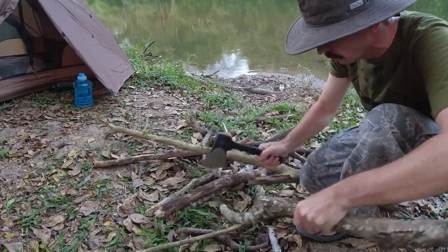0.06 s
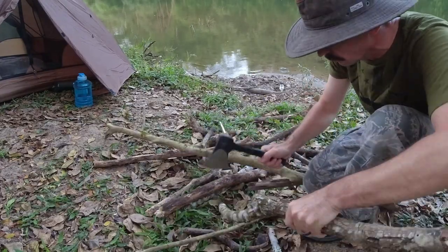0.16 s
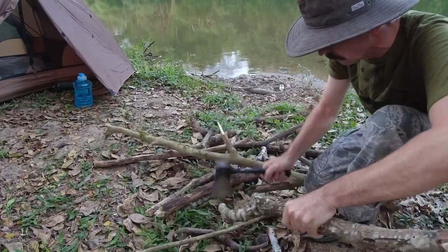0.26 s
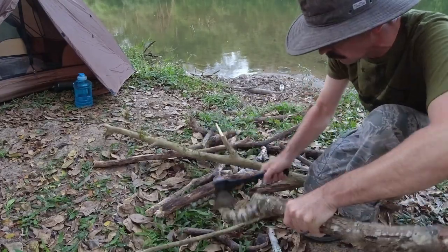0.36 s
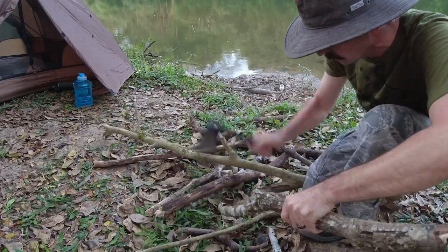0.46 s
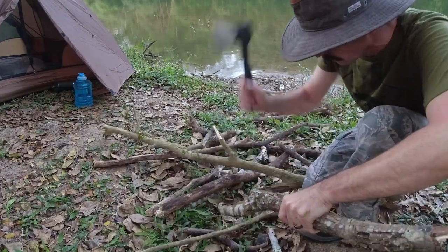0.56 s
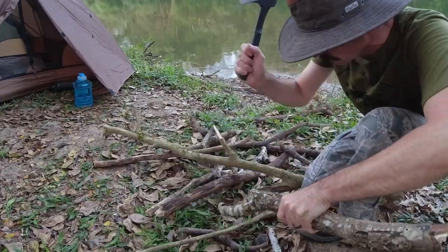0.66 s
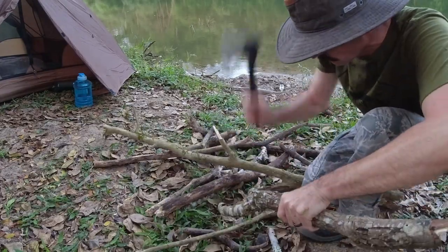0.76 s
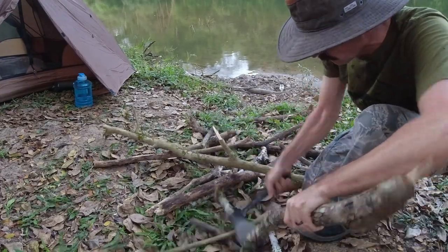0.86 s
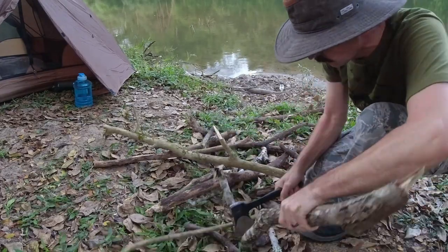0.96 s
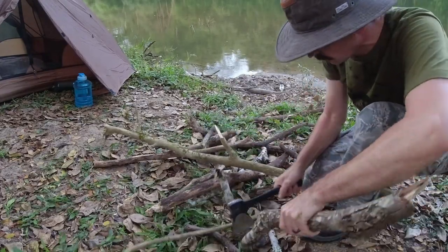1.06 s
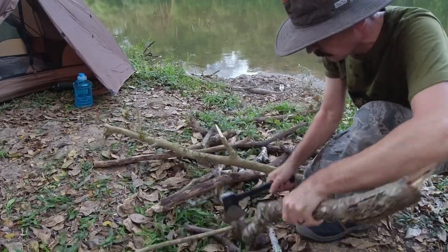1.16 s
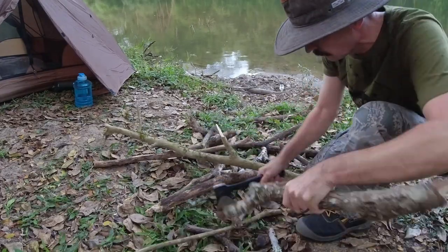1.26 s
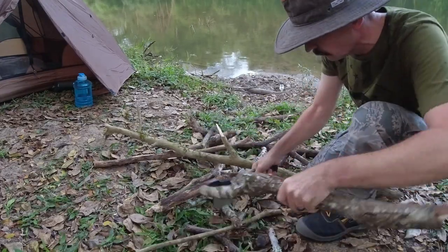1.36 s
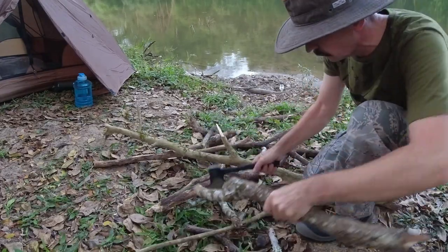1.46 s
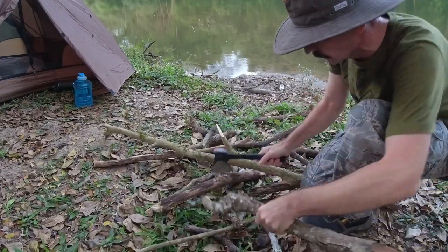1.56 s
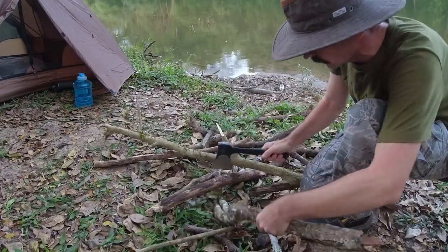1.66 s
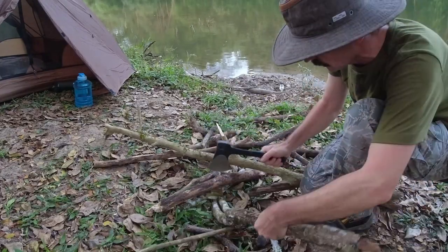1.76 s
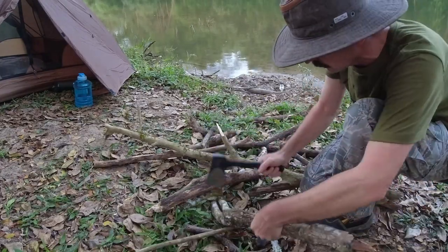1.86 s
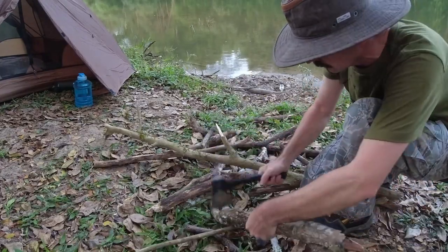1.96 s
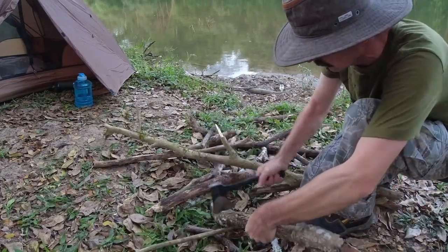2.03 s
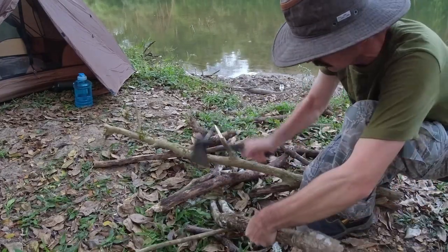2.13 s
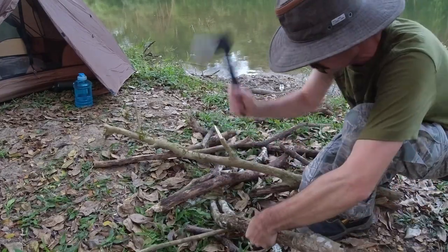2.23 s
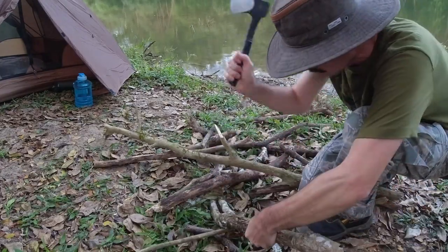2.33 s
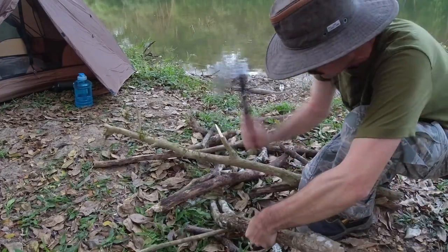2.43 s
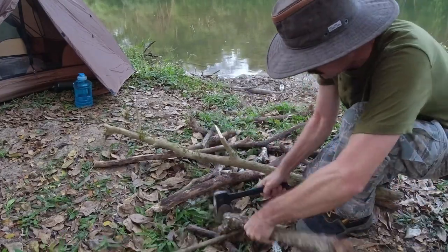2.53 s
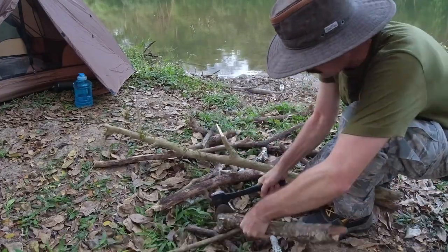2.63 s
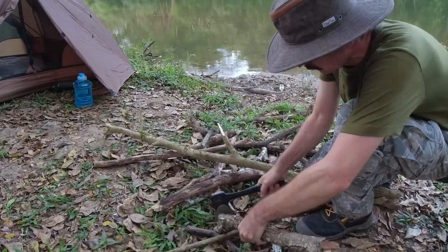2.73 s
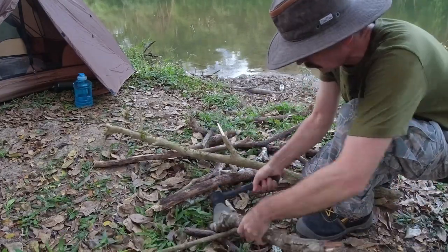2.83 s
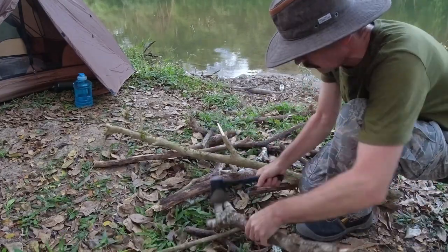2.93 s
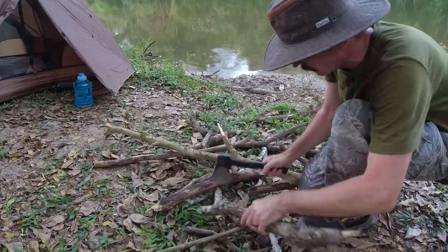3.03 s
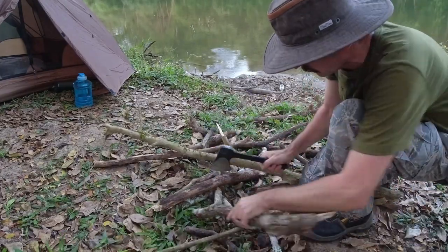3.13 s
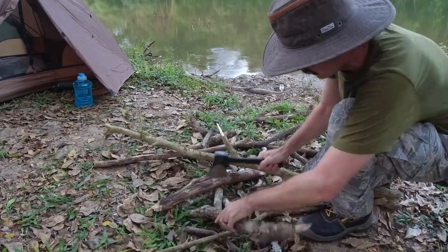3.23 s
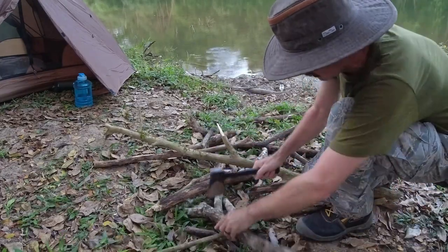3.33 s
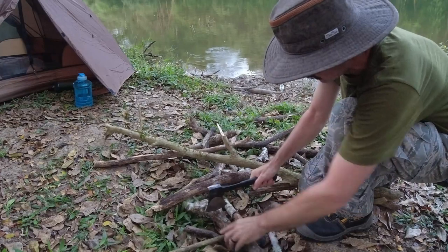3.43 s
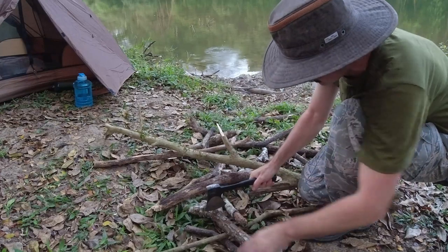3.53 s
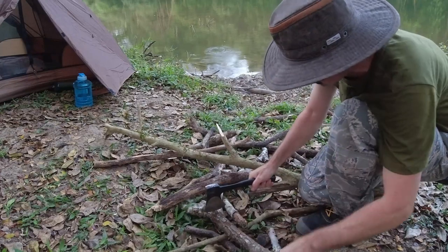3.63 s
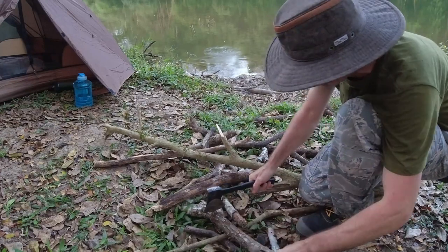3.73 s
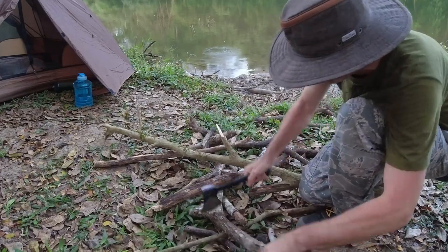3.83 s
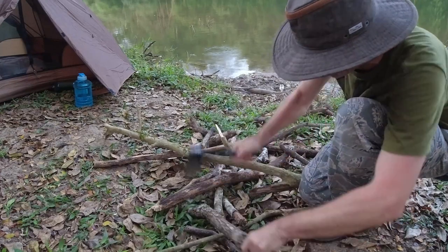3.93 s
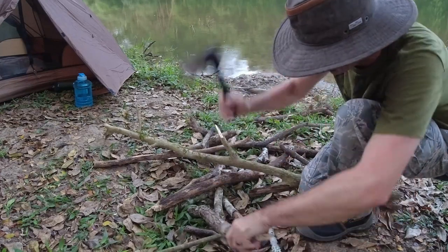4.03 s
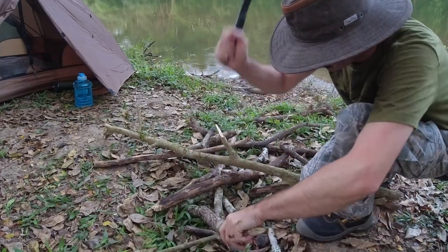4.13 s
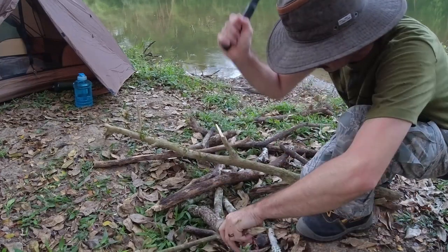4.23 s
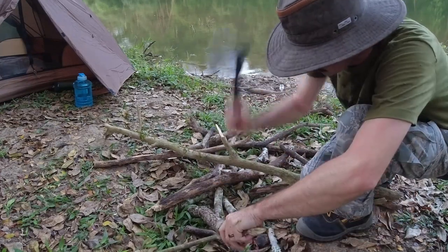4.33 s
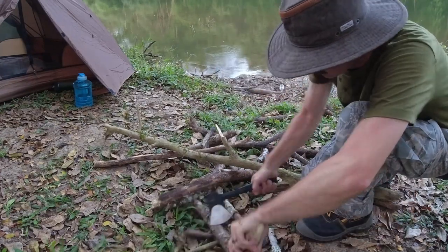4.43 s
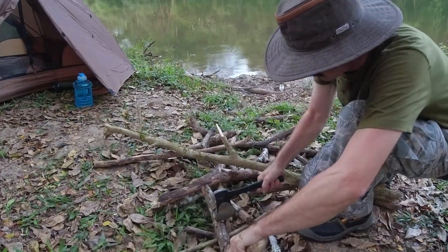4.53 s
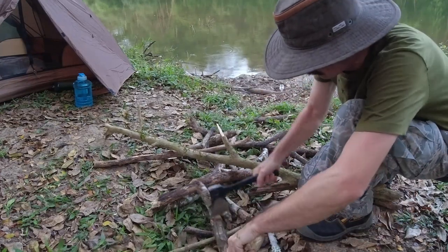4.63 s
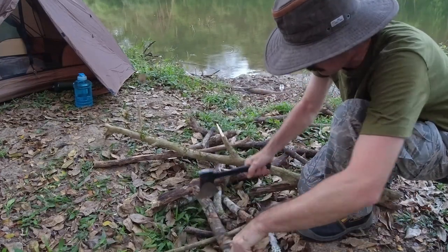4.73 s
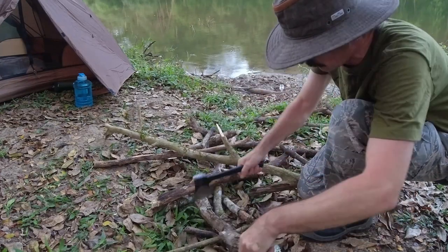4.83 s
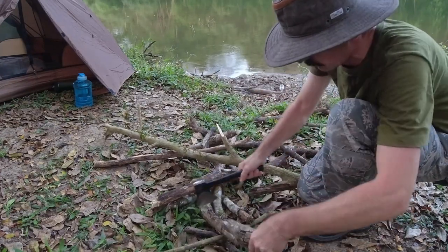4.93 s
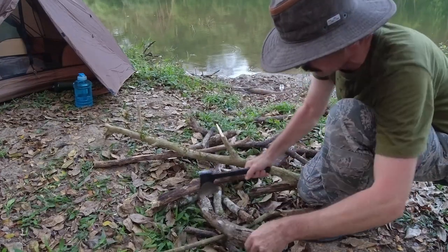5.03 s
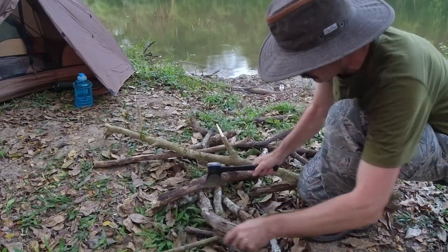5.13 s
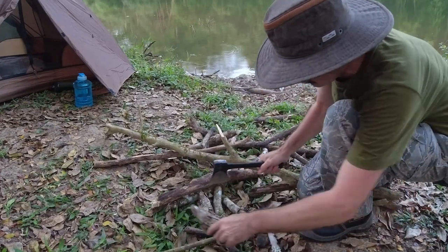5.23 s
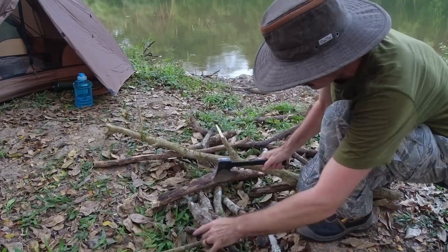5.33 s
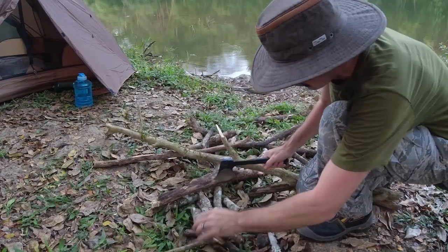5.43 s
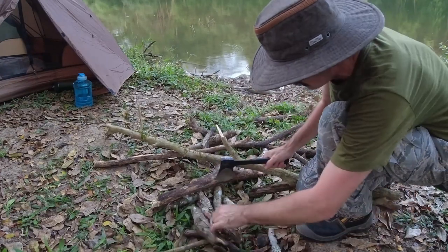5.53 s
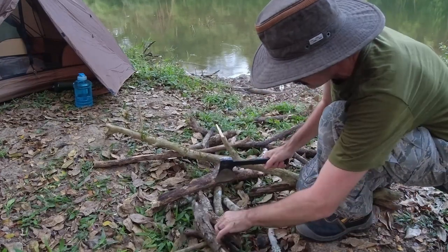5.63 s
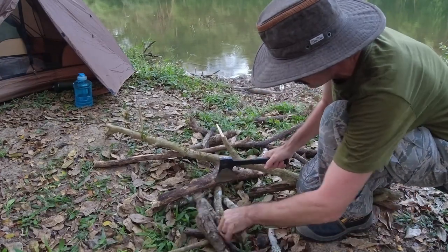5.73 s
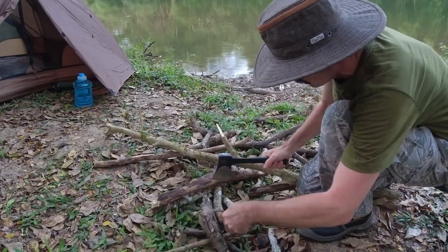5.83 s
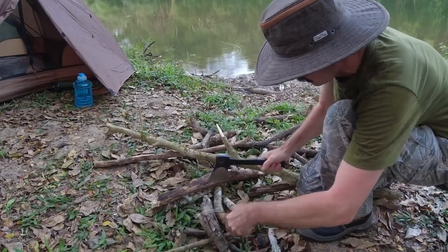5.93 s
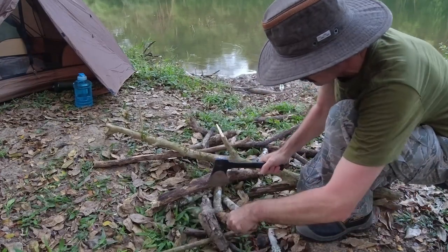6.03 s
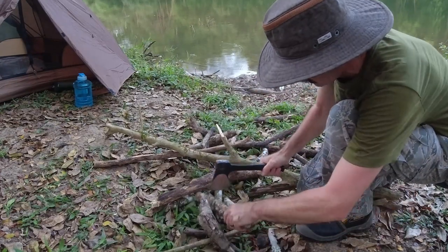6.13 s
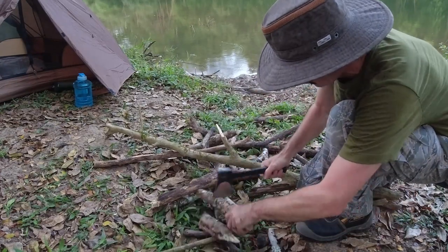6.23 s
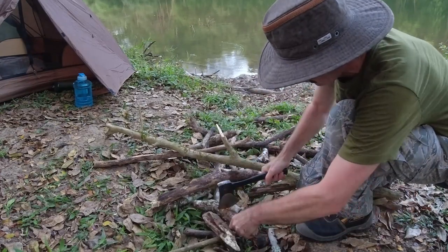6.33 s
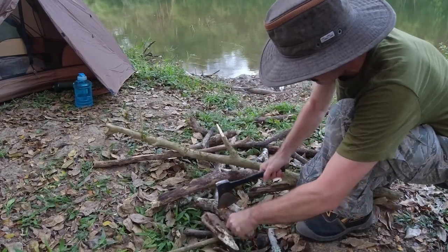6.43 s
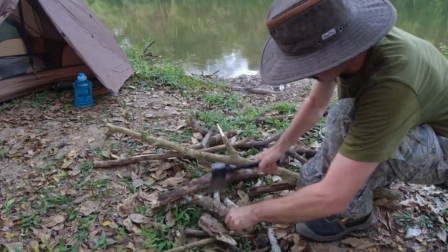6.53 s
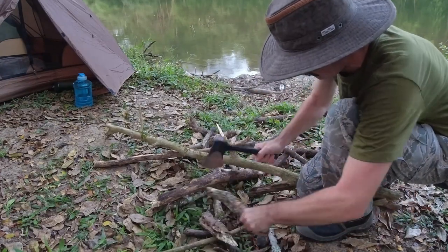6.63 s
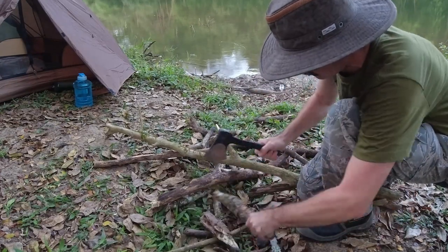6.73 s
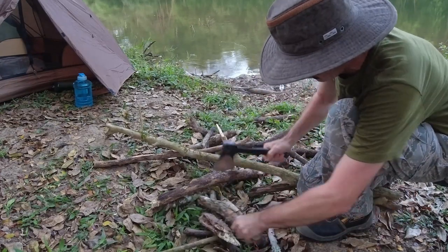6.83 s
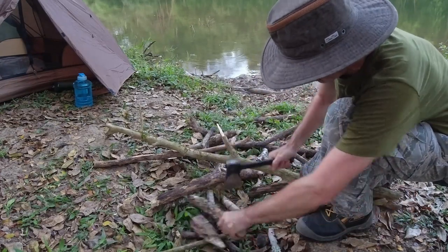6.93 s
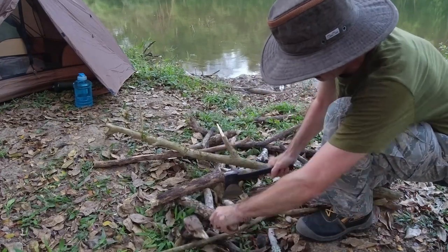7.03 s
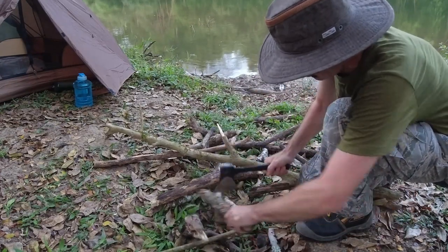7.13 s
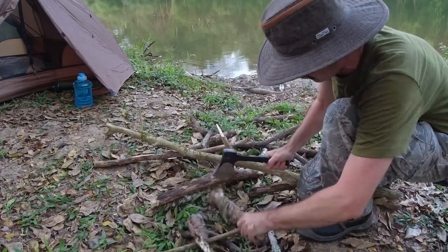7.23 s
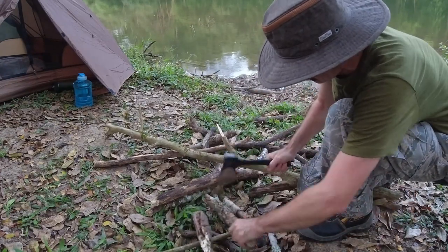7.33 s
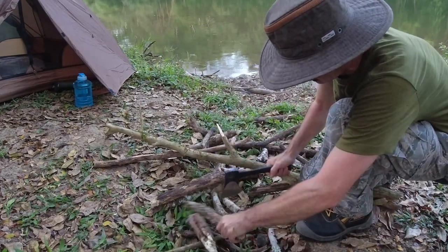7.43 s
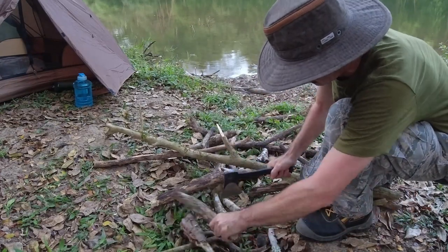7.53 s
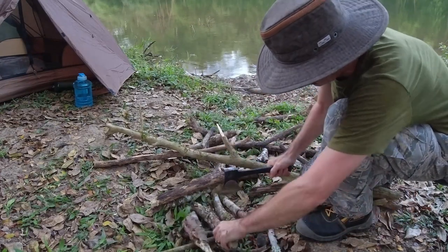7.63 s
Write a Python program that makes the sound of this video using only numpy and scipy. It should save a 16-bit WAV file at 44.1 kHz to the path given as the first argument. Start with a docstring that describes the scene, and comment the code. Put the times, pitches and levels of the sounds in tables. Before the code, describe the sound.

Dry wood is chopped near the microphone at a quiet riverside camp. Rustle and scraping lead to a glancing tap and three well-spaced loud cracks, sharp and woody, with torn fibres and falling debris. Small squeaks, ticks and leaf crackles fill the gaps. The last three seconds are mostly gentle handling, tiny bright metal tinks and a light final chop. A soft low rumble, insect hiss and faint far engine stay behind.

```python
"""A hatchet chops dry branches on riverside leaf litter: each bite is a run of clicks for tearing fibres,
with a filtered thud from the soil, decaying branch modes, and a noisy patter of dust and chips.
Glancing taps make the steel head sing in wavering sines; between blows, sticks scrape and tick in the leaves.
Dense random clicks crackle as leaves under shifting weight. Trees scatter a short echo of the close sounds;
shaped noise makes a low rumble and an insect hiss, and drifting partials make a far engine."""
import sys
import numpy as np
from scipy import signal
from scipy.fft import rfft, irfft, next_fast_len
from scipy.io import wavfile

SR = 44100
rng = np.random.default_rng(int(sys.argv[2]) if len(sys.argv) > 2 else 0)


def wav_record(signal):
    """Record a signal, one row per channel, as 16-bit PCM in the file named by sys.argv[1]."""
    frames = np.transpose(np.atleast_2d(signal))
    bounded = np.clip(frames, -1, 1)
    # unit amplitude maps onto the largest positive 16-bit level
    quanta = np.round(bounded * 32767).astype(np.int16)
    wavfile.write(sys.argv[1], SR, quanta)


N = 338688
T = np.arange(int(.7 * SR)) / SR  # time axis in seconds for every short sound

# full blows that shake litter and soil: start_s, spray_db, spray_t60_s, soil_db (before a small lift)
BLOWS = [(.378, -48.5, 0.35, -45.5), (.923, -31, 0.32, -43.5), (2.575, -32, 0.43, -50.5),
         (4.483, -31, .3, -53.5), (7.495, -46.5, 0.1, -64)]
# shared colour of the quiet ticks and rubs, dull with a notch near 6.3 kHz: frequency_hz, gain_db
QUIET_COLOUR = [(100, 9.5), (3000, 2), (4800, 1.5), (6300, -16.5), (7200, -4), (8300, 2.5), (10500, -9.5),
                (14000, -7), (16000, -7.5)]


def amp(db):
    """Decibels to gain."""
    return 10 ** (np.asarray(db) / 20)


def level(x, db):
    """Set the rms level."""
    return x * amp(db) / np.sqrt(np.mean(x ** 2))


def blow(x, db):
    """Set the level of a short sound, as if all its energy fell in a hundredth of a second."""
    return x * amp(db) / np.sqrt(np.sum(x ** 2) / (SR / 100))


def add(out, s, x):
    """Mix x into out from time s on."""
    i = int(np.clip(s * SR, 0, N - 1))
    out[i:i + len(x)] += x[:N - i]


def colour(x, points, tilt_db=0):
    """Minimum-phase filter through (Hz, dB) points, with an extra slope per octave."""
    n = next_fast_len(len(x), real=True)
    octave = np.log2(np.maximum(np.arange(n // 2 + 1) * SR / n, 10))
    hz, db = np.transpose(points)
    point_octave = np.log2(hz)
    slope = tilt_db * (np.maximum(octave, point_octave[0]) - point_octave.mean())
    gain_db = np.interp(octave, point_octave, db) + slope
    # folding the cepstrum forward in time makes the filter causal
    cepstrum = irfft(np.log(amp(gain_db)), n)
    cepstrum[1:n // 2] *= 2
    cepstrum[n // 2 + 1:] = 0
    response = np.exp(rfft(cepstrum, n))
    return irfft(rfft(x, n) * response, n)[:len(x)]


def band(x, hz, octaves, order=1):
    """Band-pass some octaves wide, with edges held below the top of the spectrum."""
    edges = hz * 2. ** (np.array([-.5, .5]) * octaves)
    edges = np.minimum(edges, [.35 * SR, .4 * SR])
    return signal.lfilter(*signal.butter(order, edges, "band", fs=SR), x)


def fade(t60, t=T):
    """Exponential decay, 60 dB in t60 seconds."""
    return np.exp(-np.log(1000) * t / t60)


def wander(n, per_s):
    """Random motion with a spread near 1, from straight lines between random knots."""
    knots = rng.standard_normal(size=4096)
    return np.sqrt(3 / 2) * np.interp(np.arange(n) * per_s / SR, np.arange(len(knots)), knots)


def grains(n, per_s, spread_db):
    """Random clicks: a positive spread makes a few stand out, a negative one makes a few faint."""
    size = amp(spread_db * np.minimum(rng.exponential(size=n), 4))
    return (rng.random(n) < per_s / SR) * rng.choice([-1, 1], n) * size


def tear(ms, after_s, size=4096):
    """A run of breaking fibres that lasts some milliseconds and then dies away."""
    t = T[:size]
    hold_s = ms / 1000
    return grains(size, per_s=14000, spread_db=-1.5) * fade(after_s, np.maximum(t - hold_s, 0))


def snap(ms, after_s, first_db):
    """The first fibre goes with a sharp click; the rest tear along with it and after it."""
    fibres = blow(tear(ms, after_s), 0)
    return fibres + blow(signal.unit_impulse(len(fibres)), first_db)


def stick(x, hz, ring_db, octaves, count=4):
    """Every stick adds a few short resonances of its own around some pitch."""
    pitches = np.minimum(hz * 2 ** (.6 * rng.standard_normal(count)), 11000)
    return x + amp(ring_db) * sum(band(x, f, octaves) for f in pitches)


def tick(ms, hz):
    """A small piece of dry wood snaps or lands, pitched by its size."""
    wood = stick(snap(ms, after_s=0.026, first_db=-2.0), hz, ring_db=2, octaves=0.05)
    return band(wood, hz, octaves=1.0)


def thud(ms):
    """The stick is pressed into the soil and springs back: a dull push with a short rattle."""
    # frequency_hz, gain_db
    soil_colour = [(50, -34.5), (110, -15), (200, -3.5), (350, -2.5), (520, -8), (800, -14.5), (1500, -34),
                   (4000, -58.5)]
    return colour(snap(ms, after_s=0.056, first_db=0), soil_colour)


def steel(hz, waver_hz, waver_db):
    """A thin tone of the hatchet head, wavering as it rubs against the wood."""
    phase = 2 * np.pi * np.cumsum(hz + waver_hz * wander(len(T), per_s=120)) / SR
    return np.sqrt(2) * np.sin(phase) * amp(waver_db * wander(len(T), per_s=110))


def air():
    """Steady shaped noise: a low rumble and an even hiss of insects."""
    # riverside air: frequency_hz, gain_db
    air_colour = [(20, -15.5), (55, -6), (110, -3.5), (190, -6.5), (350, -15.5), (500, -12), (1000, -19.5),
                  (2000, -26.5), (3500, -34), (4700, -25), (5400, -17), (6500, -21.5), (7800, -32.5),
                  (10000, -43), (14000, -44), (16000, -60)]
    return level(colour(rng.standard_normal(N), air_colour), -65)


def engine():
    """A far engine drifts in pitch; its partials follow one phase and waver separately in level."""
    # path of the engine: time_s, pitch_hz, level_db
    engine_path = [(0, 111.8, -72), (2.5, 118.7, -79), (4.9, 118.1, -74), (5.7, 100.7, -71.5),
                   (7.68, 108.1, -71)]
    # partials: pitch_multiple, level_db (added to the path)
    orders = [(.5, -8), (1, 0), (2, -7)]
    s, hz, db = np.transpose(engine_path)
    t = np.arange(N) / SR
    pitch_hz = np.interp(t, s, hz) + 2.1 * wander(N, per_s=11)
    phase = 2 * np.pi * np.cumsum(pitch_hz) / SR
    out = np.zeros(N)
    for multiple, order_db in orders:
        partial_db = np.interp(t, s, db) + order_db + 3 * wander(N, per_s=7)
        out += np.sqrt(2) * np.sin(multiple * phase) * amp(partial_db)
    return out


def weight():
    """Pressure on the litter: each shift of the body builds up, holds and lets go."""
    # knees and feet shifting: start_s (of the hold), gain_db, hold_s
    shift_table = [(0, -56.5, .16), (0.452, -70, 0.38), (1.18, -59.5, 0.15), (1.717, -68.5, 0.3),
                   (2.695, -66.5, 0.28), (3.356, -65, .65), (4.599, -62.5, 0.43), (5.414, -72, 0.73),
                   (6.263, -62.5, 0.095), (6.55, -69, 0.054), (6.834, -59.5, 0.7)]
    attack_s, release_s, rest_db = 0.055, 0.15, -78.5
    t = np.arange(N) / SR
    pressure = np.full(N, amp(rest_db))
    for s, db, length in shift_table:
        corners_s = [s - attack_s, s, s + length, s + length + release_s]
        pressure += amp(db) * np.interp(t, corners_s, [0, 1, 1, 0])
    return pressure


def litter():
    """Dry leaves crackle in little clusters under shifting weight; now and then a buried twig ticks."""
    # frequency_hz, gain_db
    leaf_colour = [(150, -16), (500, 2), (1000, 2.5), (2000, 2.5), (4000, 2.5), (6000, -10.5), (8500, -8.5),
                   (11000, -23.5), (14000, -23), (16000, -37)]
    clusters = amp(2.0 * wander(N, per_s=60) + 0.69 * wander(N, per_s=8.7))
    crackle = colour(grains(N, per_s=2300, spread_db=3.0) * clusters, leaf_colour)
    buried = signal.fftconvolve(grains(N, per_s=15, spread_db=1.5), tick(ms=2.0, hz=2410))[:N]
    return (level(crackle, -2) + level(buried, -14.5)) * weight()


def scrapes():
    """Swells of tiny slips that clump as rough bark catches and slides; leaves add a fine hiss."""
    # bark and steel dragged over sticks and leaves, levels before the swell and the shared colour:
    # loudest_s, level_db, half_length_s, centre_hz, hiss_db (relative to the rub)
    scrape_table = [(0.041, -45, 0.033, 4670, -7), (0.092, -52.5, 0.088, 5030, 0.5),
                    (1.272, -49.5, 0.063, 2950, -1), (1.32, -48.5, 0.059, 3960, -19),
                    (1.429, -50, 0.035, 4100, -5), (1.743, -56.5, .07, 3350, -20),
                    (2.643, -48, 0.052, 4460, -18), (2.84, -52.5, 0.056, 2300, -32),
                    (2.901, -57.5, 0.052, 3270, 0.5), (3.282, -56.5, 0.088, 2590, -7),
                    (3.483, -52, 0.085, 3030, -29), (5.473, -53.5, 0.033, 2410, -18.5),
                    (5.889, -61, 0.066, 4200, -21), (6.817, -58, .035, 2390, -22),
                    (6.876, -56, .06, 2370, -10), (6.946, -58, .05, 3130, 3),
                    (7.047, -54, 0.069, 3040, -1.5), (7.188, -58, 0.048, 1940, -20),
                    (7.254, -58, 0.031, 2300, -20), (7.341, -56.5, 0.051, 2940, -13),
                    (7.532, -48, 0.056, 4420, -14), (7.651, -38.5, 0.021, 2910, -13)]
    rise = .8  # a stroke builds up faster than it dies: 1 would be even
    out = np.zeros(N)
    for s, db, half_length, hz, hiss_db in scrape_table:
        n = int(2 * half_length * SR)
        catching = amp(3.5 * wander(len(T), per_s=170))
        slips = grains(len(T), per_s=6000, spread_db=3.5) * catching
        slips = stick(slips, hz, ring_db=1.5, octaves=0.079)[:n]
        rub = level(band(slips, hz, octaves=2.18, order=2), db)
        hiss = level(band(slips, hz=10400, octaves=0.91, order=2), db + hiss_db)
        swell = np.sin(np.pi * np.linspace(0, 1, n) ** rise) ** 4
        add(out, s - swell.argmax() / SR, (rub + hiss) * swell)
    return colour(out, QUIET_COLOUR)


def twigs():
    """Twigs snap and sticks bump: small dulled ticks, with thuds from the heavier sticks."""
    # levels before the shared colour dulls the ticks:
    # start_s, level_db, length_ms, centre_hz, thud_db (relative to level_db)
    twig_table = [(.0435, -37.5, 3.3, 5700, -18.5), (.066, -50.5, 2.6, 4070, 1.5),
                  (0.5762, -55, 0.63, 3820, -5), (1.061, -65.5, 1.5, 2500, 12.5),
                  (1.1713, -47.5, 2.1, 3160, -30), (1.337, -45, 3.1, 3840, -15),
                  (2.074, -51, 1.77, 2514, -4.5), (2.223, -54, 2.3, 2060, -26), (2.6358, -42, 2, 5000, -13),
                  (2.667, -34, 10, 7900, -21.5), (2.837, -45, 1.8, 1760, -36),
                  (2.9187, -50.5, 2.3, 3050, -22), (3.101, -56, 1.1, 3930, -18),
                  (3.483, -48, 8.5, 2240, 6.5), (4.78, -60.5, 2.7, 2030, 6.5), (4.914, -45.5, 6, 4200, -27),
                  (4.9648, -55, 1.5, 2480, -7.5), (5.264, -45, .8, 4950, -16.5),
                  (5.2695, -39, 1.05, 4020, -19), (5.4665, -50.5, 3.17, 2950, -4.5),
                  (6.299, -57.5, 14.4, 1977, 0.5), (6.402, -51.5, 5.5, 2320, 6),
                  (7.1754, -49, 5.7, 1853, -13), (7.3539, -51.5, 2.8, 3480, -11),
                  (7.661, -49, 0.91, 2150, 10)]
    ticks, thuds = np.zeros(N), np.zeros(N)
    for s, db, ms, hz, thud_db in twig_table:
        add(ticks, s, blow(tick(ms, hz), db - 3.5))
        add(thuds, s, blow(thud(ms), db + thud_db))
    return colour(ticks, QUIET_COLOUR) + thuds


def clinks():
    """The steel head sings after a glancing contact until the wood damps it."""
    # start_s, level_db, pitch_hz
    clink_table = [(.37, -61, 6920), (.947, -66, 6600), (5.274, -60.5, 7180)]
    out = np.zeros(N)
    damping = np.exp(-(T / .27) ** 3)
    for s, db, hz in clink_table:
        tone = steel(hz, waver_hz=25, waver_db=4.0) * fade(1.3)
        add(out, s, amp(db) * tone * damping)
    return out


def knocks():
    """Bending modes of a branch giving way or hit: higher ones die sooner, ratios vary from stick to stick."""
    # start_s, level_db (before the low cut), pitch_hz
    knock_table = [(.373, -41, 324), (.392, -43.5, 370), (0.9149, -28.5, 365), (.9176, -31, 3700),
                   (0.9275, -29, 1770), (0.9697, -43, 1913), (1.277, -54.5, 398), (2.568, -33, 163.6),
                   (2.5698, -20.5, 1785), (2.5708, -25.5, 673), (2.573, -20, 1240), (2.743, -48.5, 2320),
                   (2.849, -54, 1136), (3.009, -59, 1203), (3.253, -52, 422), (3.485, -45, 474),
                   (3.678, -57.5, 600), (3.78, -56, 1101), (4.4795, -16.5, 1483), (4.481, -25, 2070),
                   (4.4835, -27.5, 900), (4.4957, -35, 1430), (4.9649, -47.5, 585), (4.998, -50.5, 620),
                   (7.425, -55.5, 650), (7.489, -41.5, 1316)]
    # modes of a dry branch: pitch_multiple, level_db
    branch_modes = [(1.002, 0), (1.169, -6), (1.471, -12), (1.93, -11), (2.401, -9.5), (2.85, -14)]
    t60_at_1khz_s, damping_power = .029, .13
    out = np.zeros(N)
    ratio, mode_db = np.transpose(branch_modes)
    for s, db, hz in knock_table:
        pitches = hz * ratio ** (1 + 0.046 * rng.standard_normal(len(ratio)))
        t60s = t60_at_1khz_s / (pitches / 1000) ** damping_power
        ring = np.zeros(len(T))
        for f, d, t60 in zip(pitches, mode_db, t60s):
            ring += amp(d) * np.sin(2 * np.pi * f * T) * fade(t60)
        add(out, s, blow(ring, db))
    # a low cut at 150 Hz keeps the knocks free of bass from their sudden starts
    return signal.lfilter(*signal.butter(2, 150, "high", fs=SR), out)


def cracks():
    """Fibres tear or split under the blade, over the thud of the branch on the ground."""
    # start_s, level_db, length_ms, tilt_db_per_octave, thud_db (relative to the crack)
    crack_table = [(0.3741, -31.5, 3.5, 6, -6), (0.9154, -18, 3.1, .5, -11),
                   (0.9322, -23, 2.5, -6.5, -15.5), (0.9372, -21.5, 1.5, 4.5, -20.5),
                   (.948, -31.5, 3, 5, -2), (.9677, -37, 5.6, -1, -16.5), (2.563, -27.5, 4.9, 3, -18.5),
                   (2.5671, -18, 2.6, 1, -10), (2.586, -36, 1.4, 1.5, -11), (4.4724, -19.5, 3.8, 0.5, -5.5),
                   (4.4802, -18.5, 3.9, -2, -11), (5.2441, -40, 3, 5, -15.5), (5.275, -33, 0.87, 5, -21.5),
                   (7.4889, -32, 4.8, 3.5, -23.5)]
    # splintering wood: frequency_hz, gain_db
    splinter_colour = [(200, -29.5), (600, -4), (1200, 3), (2200, -2.5), (3600, 0.5), (5200, -2.5),
                       (6500, -8), (8300, -5.5), (11000, -17.5), (15500, -23.5)]
    out = np.zeros(N)
    for s, db, ms, tilt_db, thud_db in crack_table:
        fibres = stick(snap(ms, after_s=0.014, first_db=-7.5), hz=3090, ring_db=3, octaves=0.042)
        add(out, s, blow(colour(fibres, splinter_colour, tilt_db), db))
        add(out, s, blow(thud(ms), db + thud_db))
    return out


def shakes():
    """A blow throws up leaf dust and a few coarser chips, which patter down while the soil shudders."""
    # leaf dust pattering down: frequency_hz, gain_db
    dust_colour = [(200, -14.5), (700, -3.5), (1500, 1.5), (4000, -3.5), (6000, -2), (8500, -2.5),
                   (11000, -11), (15500, -19)]
    out = np.zeros(N)
    for s, spray_db, t60, soil_db in BLOWS:
        dust = colour(grains(len(T), per_s=9000, spread_db=6.5), dust_colour)
        coarse = stick(grains(len(T), per_s=130, spread_db=2.5), hz=2560, ring_db=9.0, octaves=0.27)
        coarse = band(coarse, hz=2700, octaves=0.97)
        patter = level(dust, 0) + level(coarse, -5)
        onset = 1 - np.exp(-T / 0.011)
        add(out, s, blow(patter * fade(t60) * onset, spray_db))
        shudder = band(rng.standard_normal(len(T)), hz=40, octaves=0.9, order=2)
        add(out, s, blow(shudder * fade(t60=0.58), soil_db + 0.5))
    return out


def chips(count=6):
    """Chips fly from every full blow and land one by one, the later ones more softly."""
    longest_flight_s, first_db, fade_db_per_s = .11, -13, 93  # first_db is relative to the spray
    out = np.zeros(N)
    for s, spray_db, _, _ in BLOWS:
        for when, size in rng.random((count, 2)):
            flight_s = longest_flight_s * when
            landing = tick(ms=1.2, hz=1700 * 2 ** (2 * size))
            landing_db = spray_db + first_db - fade_db_per_s * flight_s
            add(out, s + .015 + flight_s, blow(landing, landing_db))
    return out


def squeaks():
    """The blade squeaks as it is worked loose: a few wavering steel tones with a soft onset."""
    # start_s, level_db
    squeak_table = [(1.322, -45), (1.421, -54), (1.439, -53)]
    # tones: pitch_hz, level_db (relative), t60_s
    squeak_tones = [(2870, -4, 0.067), (5480, -4, 0.11), (12700, -18, .08)]
    out = np.zeros(N)
    for s, db in squeak_table:
        squeak = sum(amp(d) * steel(hz, waver_hz=45.3, waver_db=7.0) * fade(t60)
                     for hz, d, t60 in squeak_tones)
        onset = 1 - np.exp(-T / 0.0028)
        add(out, s, blow(squeak * onset, db))
    return out


def tinks():
    """Tiny bright metallic contacts ring a few high, well damped resonances."""
    # start_s, level_db
    tink_table = [(6.098, -56), (6.105, -51.5), (6.117, -56), (6.148, -57.5), (6.9452, -48)]
    # resonances: centre_hz, width_octaves, gain_db
    tink_modes = [(8660, 0.051, 3), (11630, .05, -12.5), (12900, 0.072, -4.5)]
    out = np.zeros(N)
    for s, db in tink_table:
        contact = snap(ms=1.36, after_s=0.015, first_db=-3)
        ring = sum(amp(d) * band(contact, hz, octaves, order=2) for hz, octaves, d in tink_modes)
        add(out, s, blow(ring + amp(-16) * contact, db))
    return out


def echo(x, wet_db, t60, late_db, late_t60):
    """Trunks and leaves scatter a bright short tail, far trees a faint long one."""
    # frequency_hz, gain_db
    tree_colour = [(60, -12.5), (300, -8.5), (800, -3), (1600, -0.5), (3500, -5.5), (7000, 3), (15000, -3)]
    envelope = (fade(t60) + amp(late_db) * fade(late_t60)) * (1 - np.exp(-T / 0.0087))
    scatter = grains(len(T), per_s=5000, spread_db=5.0) * envelope
    response = colour(scatter / np.sqrt(np.sum(scatter ** 2)), tree_colour)
    return amp(wet_db) * signal.fftconvolve(x, response)[:N]


def scene():
    """Near sounds and their echo over the riverside air."""
    bright = litter() + scrapes() + twigs() + clinks() + cracks() + squeaks() + tinks()
    wood = knocks()
    # the ring of the wood is sent more weakly to the echo, which keeps the tail noisy
    trees = echo(bright + amp(-10.0) * wood, wet_db=-14.5, t60=0.15, late_db=-21.5, late_t60=1.0)
    return (bright + wood + trees + shakes() + chips() + air() + engine())[None]


def record(dry):
    """The recorder cuts the top with a steep low-pass at 15950 Hz."""
    return signal.sosfilt(signal.ellip(8, .2, 70, 15950, fs=SR, output="sos"), dry)


dry = scene()
out = record(dry)
wav_record(out)
```